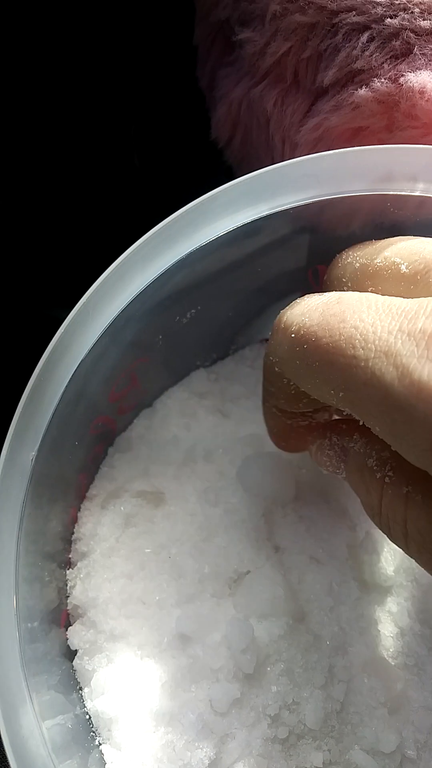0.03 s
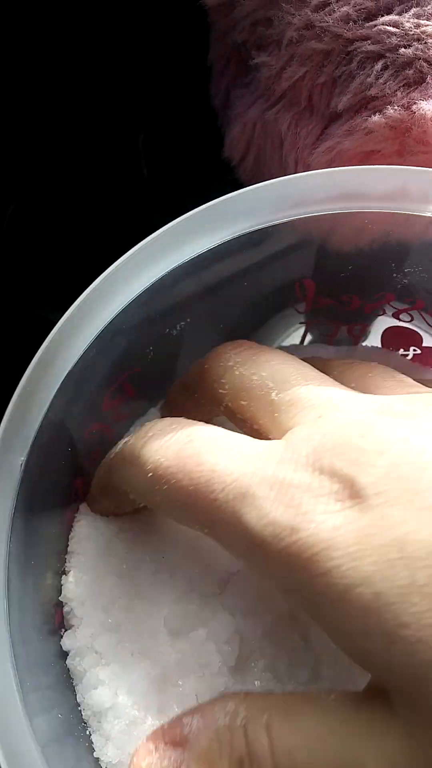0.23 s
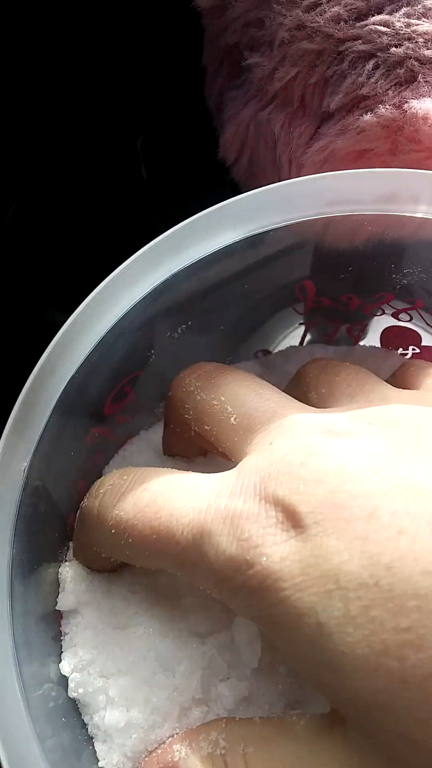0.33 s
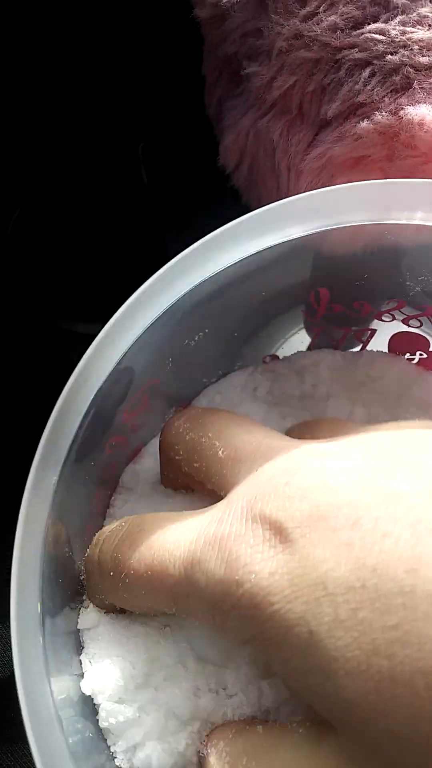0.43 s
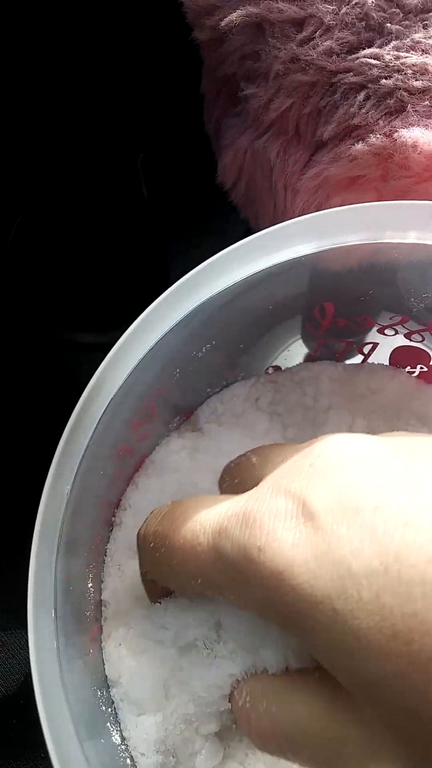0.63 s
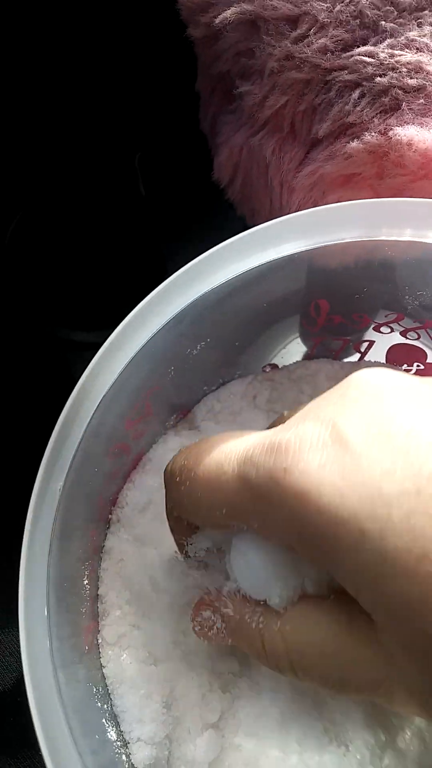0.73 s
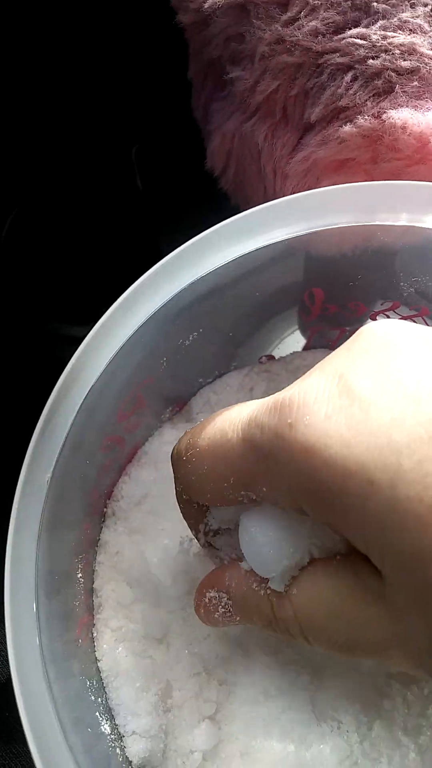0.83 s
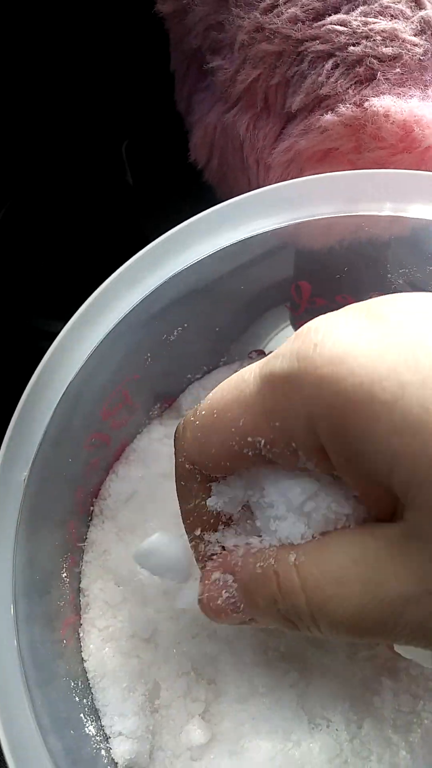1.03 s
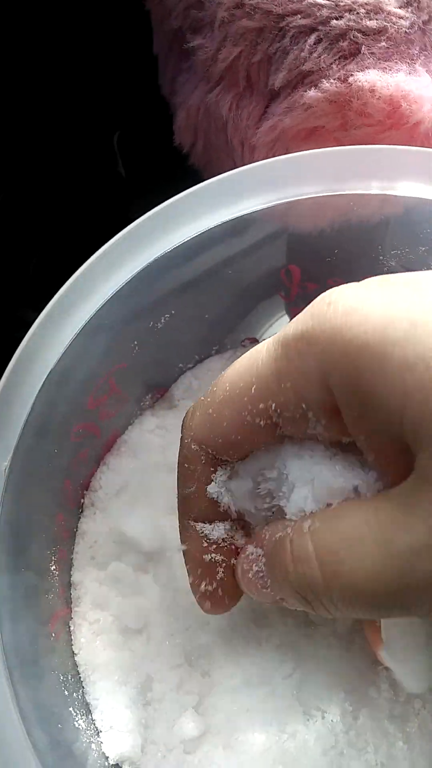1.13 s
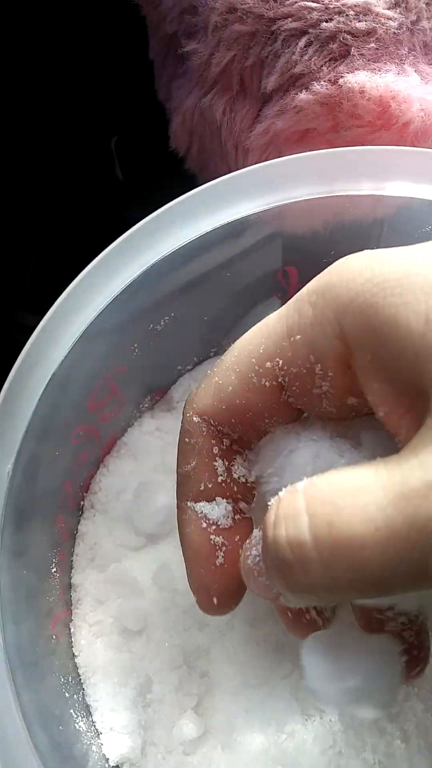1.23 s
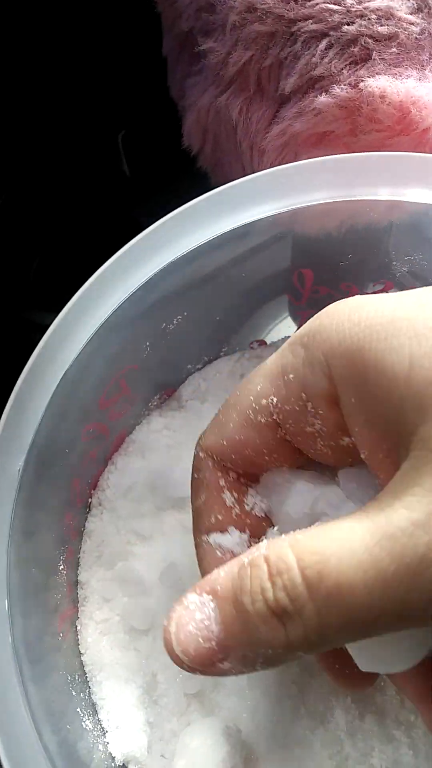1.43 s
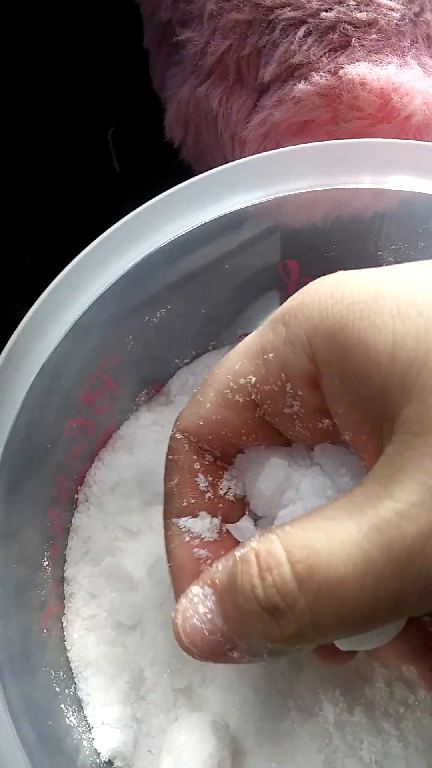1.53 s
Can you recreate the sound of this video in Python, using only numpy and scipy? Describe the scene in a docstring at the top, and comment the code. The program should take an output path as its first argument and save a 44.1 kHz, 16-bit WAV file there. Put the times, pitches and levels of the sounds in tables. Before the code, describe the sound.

Fingers crunching through crumbly powder in a plastic tub, close and dry, then squeezing a handful.

```python
"""A close, dry crunch: fingers dig three times into crumbly powder in a plastic tub, then squeeze a handful.
Thousands of tiny fractures make the sound; it loses its bass as the powder packs tight. Lumps snap,
a finger bumps the tub, loose crumbs trickle back and a last lump breaks. The microphone is right by
the tub in a small, quiet room, with a low handling rumble underneath."""
import sys
import numpy as np
from scipy import signal
from scipy.fft import irfft
from scipy.io import wavfile
from scipy.ndimage import uniform_filter1d

SR = 44100
rng = np.random.default_rng(int(sys.argv[2]) if len(sys.argv) > 2 else 0)


def generate_wav(signal):
    """Clip the signal to [-1, 1] and save it as 16-bit WAV at the path in sys.argv[1]."""
    frames = np.transpose(np.atleast_2d(signal))
    scaled = np.clip(frames, -1, 1) * 32767
    pcm = np.round(scaled).astype(np.int16)
    wavfile.write(sys.argv[1], SR, pcm)


N = 70560
T = np.arange(N) / SR
GRAIN_S = 0.00069  # decay of one tiny fracture
POWDER_PER_S, POWDER_SPREAD_DB = 4500, 3  # fracture rate and unevenness


def amp(db):
    """Decibels to gain."""
    return 10 ** (np.asarray(db) / 20)


def unit(x):
    """Scales to rms 1."""
    return x / np.sqrt(np.mean(x ** 2) + 1e-20)


def curve(points, t=T):
    """Joins (time_s, value) points by straight lines."""
    return np.interp(t, *np.transpose(points)[:2])


def add(mix, start_s, sound):
    """Lays a sound into the mix."""
    part = mix[max(round(start_s * SR), 0):][:len(sound)]
    part += sound[:len(part)]


def causal(db_at, size=4096):
    """Minimum-phase impulse response of energy 1 for a dB-by-frequency law."""
    hz = abs(np.fft.fftfreq(size, 1 / SR)) + 1
    log_gain = np.log(amp(db_at(hz)) + 1e-5)
    impulse = np.fft.ifft(np.exp(np.conj(signal.hilbert(log_gain)))).real[:size // 2]
    return impulse / np.linalg.norm(impulse)


def colour(x, spectrum):
    """Gives a white sound the spectrum of (frequency_hz, level_db) points."""
    hz, db = np.transpose(spectrum)
    impulse = causal(lambda f: np.interp(np.log(f), np.log(hz), db))
    return signal.fftconvolve(x, impulse)[:len(x)]


def brighten(x, db, edge_hz=5260):
    """Shelves the treble up or down."""
    low = signal.sosfiltfilt(signal.butter(2, edge_hz, fs=SR, output="sos"), x)
    return low + amp(db) * (x - low)


def swell(start_s, rise_s, decay_s):
    """Straight rise, exponential fall."""
    return np.clip((T - start_s) / rise_s, 0, 1) * np.exp(-np.maximum(T - start_s - rise_s, 0) / decay_s)


def ring(hz, t60_s, rise_s):
    """One mode, set going by a soft push."""
    t = T[:SR // 4]
    return np.minimum(t / rise_s, 1) * np.exp(-np.log(1000) * t / t60_s) * np.sin(2 * np.pi * hz * t)


def fractures(per_s, spread_db, kinds=24, size=500):
    """A steady stream of tiny breaks of uneven size, each a short burst in one of several colours."""
    clicks = (rng.random(N) < per_s / SR) * amp(spread_db * np.minimum(rng.exponential(1, N), 4))
    kind = rng.integers(0, kinds, N)
    spectra = np.fft.rfft(rng.standard_normal((kinds, size)) * np.exp(-T[:size] / GRAIN_S))
    bursts = irfft(spectra / np.sqrt(np.mean(abs(spectra) ** 2, 0)))  # white on average
    stream = sum(signal.oaconvolve(clicks * (kind == k), bursts[k])[:N] for k in range(kinds))
    return stream / np.sqrt(abs(uniform_filter1d(stream ** 2, size)) + 1e-4)


# Handling, rising and falling: time_s, level_db
HANDLING_LEVEL = [(0.0, -74.5), (0.288, -72), (0.306, -54), (0.32, -49), (0.68, -77), (0.726, -60),
                  (0.918, -76.5), (0.98, -62), (1.01, -70), (1.086, -63.5), (1.154, -72), (1.224, -59),
                  (1.362, -77), (1.478, -57), (1.506, -69.5), (1.6, -58)]
# Tone of the rumble and of the room's hiss: frequency_hz, level_db
RUMBLE_SPECTRUM = [(15, -46), (30, -24), (48, -2.5), (75, -4), (120, -2.5), (170, -18), (300, -29.5),
                   (800, -62)]
HISS_SPECTRUM = [(30, 8.5), (200, 4), (700, -5.5), (1500, -8), (4000, -13), (9000, -16), (16000, -15)]


def background(rumble_gain_db=1, hiss_db=-72):
    """Handling rumble and the hiss of a quiet room at the microphone."""
    rumble = unit(colour(rng.standard_normal(N), RUMBLE_SPECTRUM))
    hiss = unit(colour(rng.standard_normal(N), HISS_SPECTRUM))
    return amp(curve(HANDLING_LEVEL) + rumble_gain_db) * rumble + amp(hiss_db) * hiss


def room_echoes(x, t60_s, band_hz):
    """The nearby walls return a dying tail of dense reflections."""
    t = T[:SR // 2]
    tail = rng.standard_normal(len(t)) * (t > .001) * np.exp(-np.log(1000) * t / t60_s)
    band = signal.butter(2, band_hz, "band", fs=SR, output="sos")
    return signal.sosfilt(band, signal.fftconvolve(x, tail / np.linalg.norm(tail))[:N])


# Modes of the tub's floor: pitch_hz, relative_db, t60_s
FLOOR_MODES = [(235, 0.5, 0.051), (444, -5, 0.026), (740, -19, 0.05), (81.3, -28.5, 0.23)]
# Soft taps and rubs on its wall: start_s, level_db, pitch_hz, t60_s
WALL_TAPS = [(.0, -56.5, 419, 0.14), (.004, -64, 1023, 0.057), (.088, -52.5, 710, 0.068),
             (0.091, -71.5, 2825, 0.095), (0.088, -74, 5380, 0.2), (0.206, -55, 555, .08),
             (.506, -28, 766, 0.043), (.572, -23, 513, 0.02), (0.732, -32, 568, 0.033),
             (0.769, -40.5, 567, 0.056), (0.846, -58, 500, 0.059), (1.051, -59, 1170, 0.054),
             (1.067, -41.5, 772, 0.024), (1.083, -40.5, 740, 0.015), (1.11, -57.5, 763, 0.065),
             (1.176, -47.5, 644, 0.084), (1.334, -50, 2500, 0.022), (1.383, -60, 1117, 0.16)]


def tub_knocks(bump_s=.3155, bump_db=-16):
    """A finger bumps the floor of the tub, and light touches ring its wall."""
    out = np.zeros(N)
    for hz, db, t60_s in FLOOR_MODES:
        add(out, bump_s, amp(bump_db + db) * ring(hz, t60_s, rise_s=.0096))
    for start_s, db, hz, t60_s in WALL_TAPS:
        add(out, start_s, amp(db) * ring(hz, t60_s, rise_s=.0028))
    return out


# Crumbs falling back into the tub: start_s, level_db, rise_s, decay_s, treble_db
CRUMB_FALLS = [(0.839, -60, 0.0067, 0.094, 11.5), (.96, -96.5, 0.0091, .3, 20),
               (1.047, -60.5, 0.029, 0.021, 3), (1.17, -52, 0.0062, 0.02, 2.5),
               (1.207, -59, 0.012, 0.039, 1.5), (1.328, -73, 0.0067, 0.11, 16),
               (1.459, -57.5, 0.013, 0.046, -29)]
# Tone of their patter: frequency_hz, level_db
PATTER_SPECTRUM = [(250, -34), (480, -23), (700, -5.5), (1000, -6.5), (1300, 5), (1650, -19), (2400, -8.5),
                   (3150, -28.5), (4000, -14), (5000, -9.5), (6000, -37.5), (8400, -38.5), (12000, -47)]
# Modes of the tub under the crumbs: pitch_hz, relative_db, t60_s
WALL_MODES = [(645, 4, 0.056), (798, 10.5, 0.027), (1200, -14, 0.049), (1280, -9, 0.088),
              (2005, -4.5, 0.053), (2600, -4.5, 0.038), (3724, -6.5, 0.039), (3990, -20, 0.029),
              (4750, -6, 0.021), (4826, -18, 0.023), (6710, -21.5, 0.023)]


def trickling_crumbs(ring_db=-5.5):
    """Loose crumbs patter into the tub and make the plastic ring."""
    impacts = fractures(per_s=1800, spread_db=3.5)
    wall = sum(amp(db) * ring(hz, t60_s, GRAIN_S) for hz, db, t60_s in WALL_MODES)
    ringing = unit(signal.fftconvolve(impacts, np.diff(wall))[:N])
    patter = colour(impacts, PATTER_SPECTRUM) + amp(ring_db) * ringing
    return sum(amp(db) * swell(start_s, rise_s, decay_s) * brighten(patter, treble_db)
               for start_s, db, rise_s, decay_s, treble_db in CRUMB_FALLS)


# Lumps that crumble after the squeeze: start_s, level_db, rise_s, decay_s
LUMP_CRUMBLES = [(0.939, -61, 0.0027, 0.029), (1.426, -41.5, 0.0069, 0.026)]
# Their tone from close by: frequency_hz, level_db
CRUMBLE_SPECTRUM = [(100, -48), (180, -9.5), (300, 5.5), (600, -6.5), (1200, 1), (2000, 2), (2800, -4.5),
                    (4300, -11), (6300, -29), (12000, -58)]


def crumbling_lumps():
    """A lump falls apart in a brief rush of fractures."""
    rush = colour(fractures(POWDER_PER_S, POWDER_SPREAD_DB), CRUMBLE_SPECTRUM)
    return sum(amp(db) * swell(start_s, rise_s, decay_s) * rush
               for start_s, db, rise_s, decay_s in LUMP_CRUMBLES)


# Lumps snapping close to the microphone: start_s, level_db, centre_hz, width_octaves
LUMP_SNAPS = [(0.2355, -29, 780, 0.99), (0.3148, -27.5, 710, 1.3), (0.332, -43, 3000, 0.73),
              (0.377, -27, 1630, 0.68), (0.462, -17, 1520, 1.1), (.507, -22, 925, 0.73),
              (0.5762, -38.5, 5000, 2), (.2571, -19.5, 1750, .8), (.4728, -17.5, 2000, .75),
              (.8478, -35, 2200, 1.7), (1.4463, -29, 1900, 1.1), (0.672, -32.5, 3130, 0.91),
              (0.714, -33.5, 2600, 0.47), (.733, -37, 2370, 0.86), (.929, -42.5, 5560, 0.48),
              (0.939, -41, 1820, 0.44), (.974, -46, 5270, 0.75), (1.176, -42.5, 2460, 0.75),
              (1.18, -54, 1300, 1)]


def snapping_lumps(top_hz=6500, spray_db=-16, spray_decay_s=.0068):
    """A lump gives way: one sharp crack and a short spray of fragments, muffled by the powder around it."""
    out, t = np.zeros(N), T[:SR // 25]
    for start_s, db, centre_hz, octaves in LUMP_SNAPS:
        def crack_db(hz):
            """A band around the centre, with the top rolled off."""
            band_loss = 1 + abs(np.log2(hz / centre_hz) / octaves) ** 4
            return -20 * np.log10(band_loss * (1 + (hz / top_hz) ** 10))

        crack = causal(crack_db)[:len(t)]
        crack /= abs(crack).max()
        spray = signal.fftconvolve(rng.standard_normal(len(t)), crack / np.linalg.norm(crack))[:len(t)]
        add(out, start_s, amp(db) * (crack + amp(spray_db) * spray * np.exp(-t / spray_decay_s)))
    return out


# Push of the fingers, digging then squeezing: time_s, level_db
FINGER_PUSH = [(0.24, -40), (0.25, -37), (0.256, -31), (0.306, -52), (0.316, -54), (0.326, -45.5),
               (0.378, -27.5), (0.428, -44.5), (0.444, -31.5), (0.476, -31), (0.498, -31), (0.504, -31.5),
               (0.542, -40), (0.652, -40.5), (0.858, -55), (0.92, -70)]
# Tone of the breaking powder at close range: frequency_hz, level_db
CRUNCH_SPECTRUM = [(100, -54), (160, -10), (230, -6.5), (400, -4.5), (620, -1.5), (800, -3.5), (1000, -7.5),
                   (1400, -6), (2100, -7), (2700, -10.5), (3300, -18), (4600, -19.5), (6000, -31.5),
                   (8500, -42), (12000, -51), (15500, -48)]
# Packing takes away the bass below this edge: time_s, edge_hz
PACKING_EDGE = [(.24, 520), (.27, 270), (.30, 296), (.34, 181), (.39, 170), (.46, 176), (.53, 185),
                (.62, 250), (.70, 432), (.80, 505), (.90, 745)]
# The closing fist muffles the crunch above this edge: time_s, edge_hz
FIST_EDGE = [(.40, 14300), (.52, 11600), (.62, 8600), (.72, 8300), (.80, 6000)]
# Brightness of the crunch: time_s, treble_db
CRUNCH_TREBLE = [(.24, -3), (.256, 7.5), (.268, 14), (.31, 11.5), (.38, 9.5), (.47, 11.5), (.56, 8),
                 (.62, 5.5), (.67, 10), (.78, 8.5), (.9, -1)]


def powder_crunch(gain_db=-1, release_s=.045, packing_order=7.2, fist_order=7.5):
    """Fractures follow the push of the fingers; packing takes the bass away and the fist the fizz."""
    grains = colour(fractures(POWDER_PER_S, POWDER_SPREAD_DB), CRUNCH_SPECTRUM)
    frames = dict(fs=SR, nperseg=512, noverlap=384)
    hz, t, spectra = signal.stft(grains, **frames)
    hz = hz[:, None] + 1
    bass_loss = 1 + (curve(PACKING_EDGE, t) / hz) ** (2 * packing_order)
    fizz_loss = 1 + (hz / curve(FIST_EDGE, t)) ** (2 * fist_order)
    packed = signal.istft(spectra / np.sqrt(bass_loss * fizz_loss), **frames)[1][:N]
    first_snap_s, let_go_s = LUMP_SNAPS[0][0], FINGER_PUSH[-1][0]
    contact = (T > first_snap_s) * np.exp(-np.maximum(T - let_go_s, 0) / release_s)
    return brighten(packed, curve(CRUNCH_TREBLE)) * amp(curve(FINGER_PUSH) + gain_db) * contact


def scene(room_db=-13):
    """One microphone close to the powder and the tub, with the small room faint behind them."""
    near = powder_crunch() + snapping_lumps() + crumbling_lumps() + trickling_crumbs() + tub_knocks()
    room = amp(room_db) * room_echoes(near, t60_s=.26, band_hz=(590, 6000))
    return (near + room + background())[None]


def record(dry, fade_s=.006, top_hz=15850):
    """Soft ends and the band limit of the recorder."""
    fade = np.minimum(np.minimum(T, T[::-1]) / fade_s, 1)
    lowpass = signal.firwin(511, top_hz, window=("kaiser", 9), fs=SR)
    return signal.oaconvolve(dry * fade, lowpass[None], "same")


dry = scene()
out = record(dry)
generate_wav(out)
```